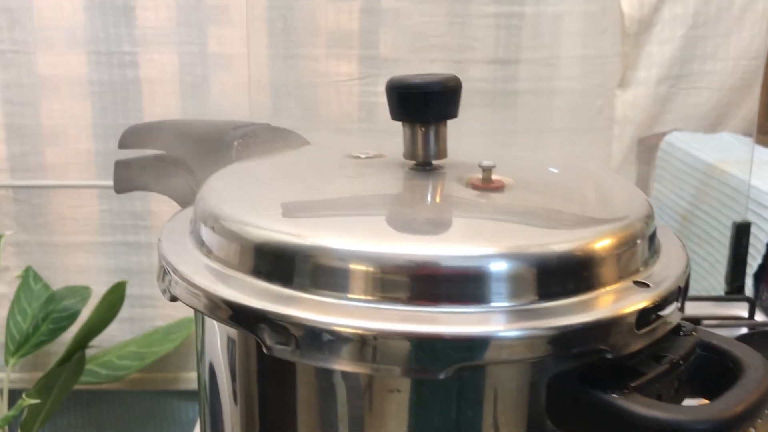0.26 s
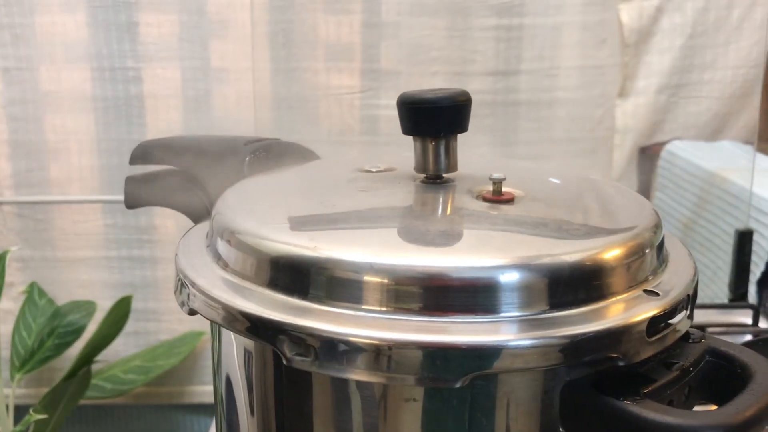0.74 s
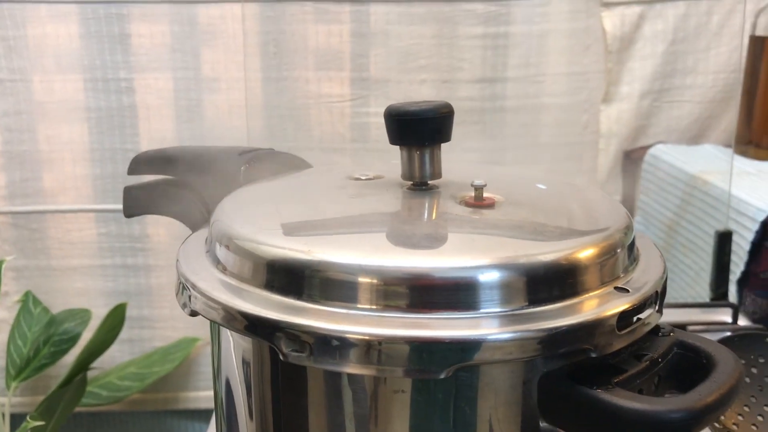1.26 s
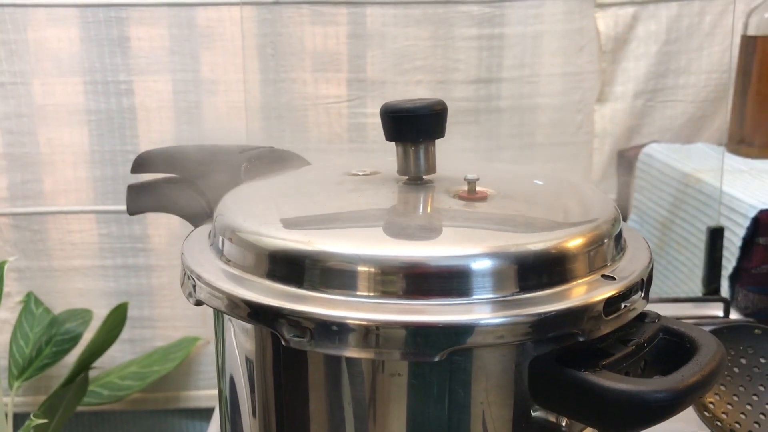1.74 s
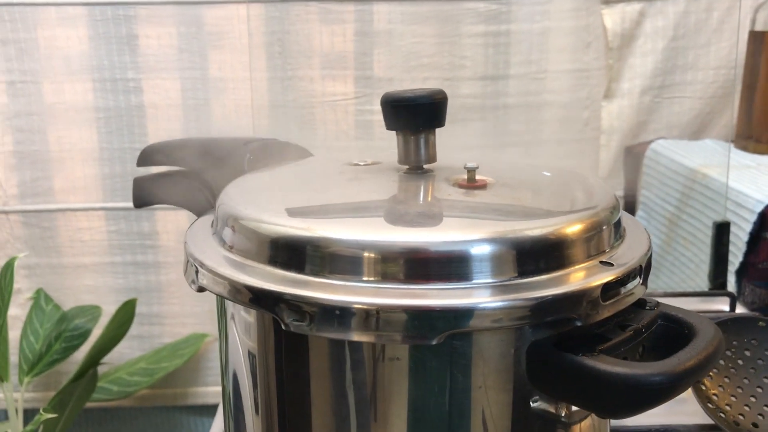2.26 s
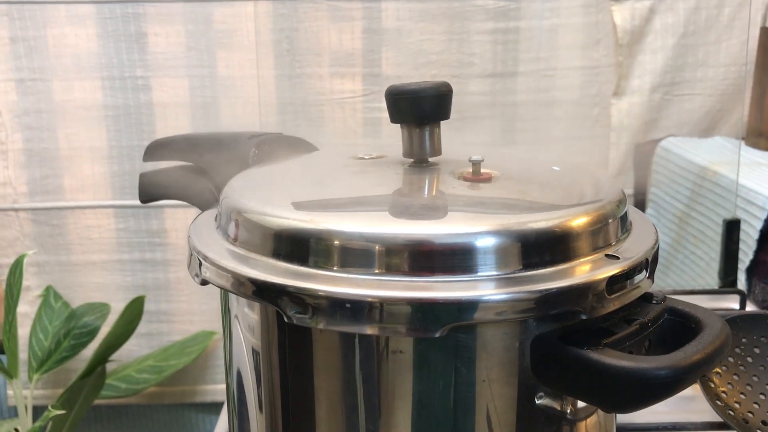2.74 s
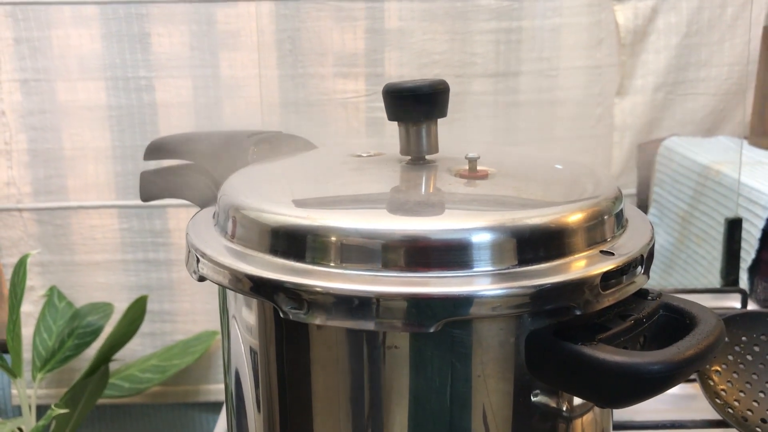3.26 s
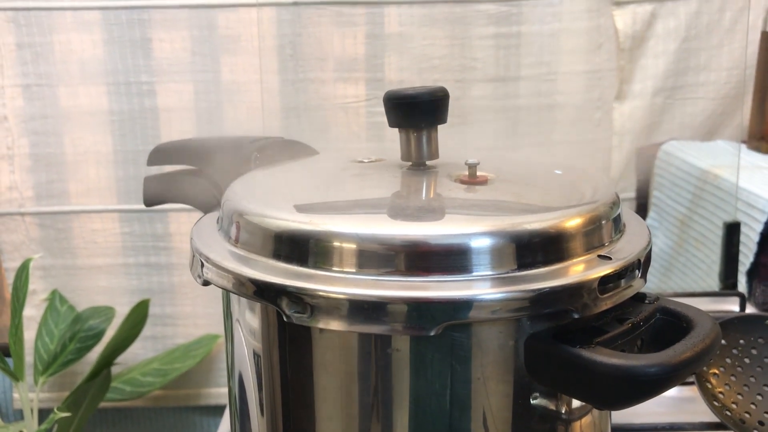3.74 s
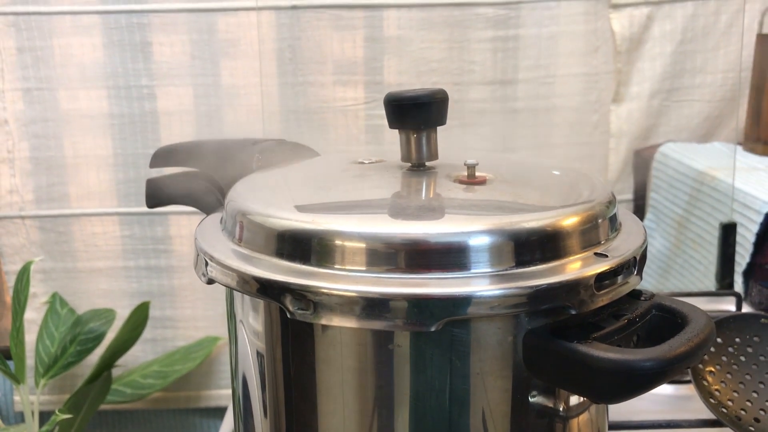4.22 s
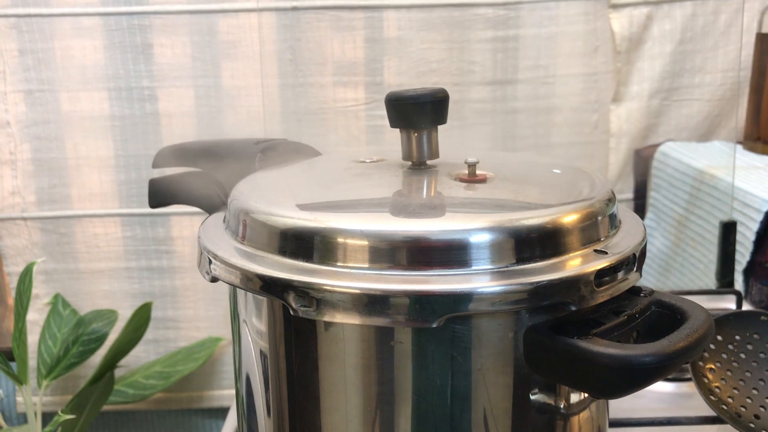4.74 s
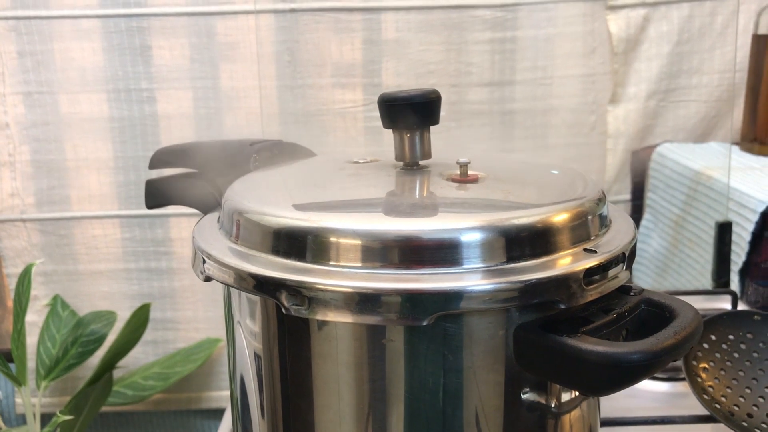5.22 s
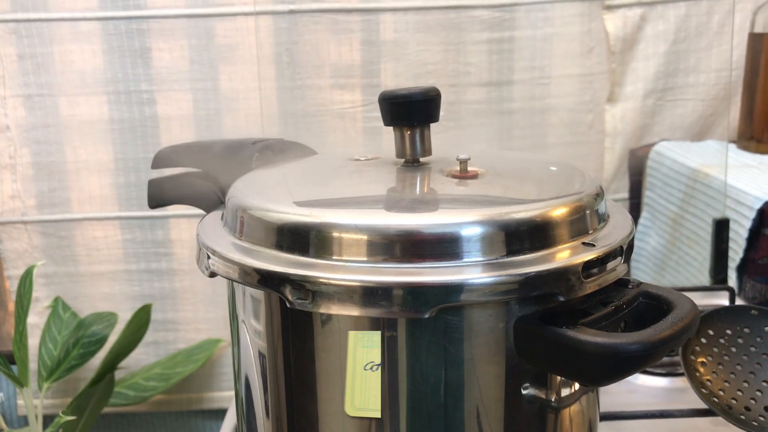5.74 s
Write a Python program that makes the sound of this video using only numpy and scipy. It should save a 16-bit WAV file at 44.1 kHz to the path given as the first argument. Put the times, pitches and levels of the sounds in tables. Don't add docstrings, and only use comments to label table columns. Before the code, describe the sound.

A pressure cooker blasts a continuous bright rush of steam, strongest at the start, over dull pot shudders and faint hum.

```python
import sys
import numpy as np
from scipy import signal
from scipy.fft import rfft, irfft, next_fast_len
from scipy.io import wavfile
from scipy.ndimage import uniform_filter1d, minimum_filter1d

SR = 44100
rng = np.random.default_rng(int(sys.argv[2]) if len(sys.argv) > 2 else 0)


def voltage_ratio(level):
    return 10 ** (np.asarray(level, float) / 20)


def inscribe(sig):
    pcm = np.round(np.clip(np.atleast_2d(sig).T, -1, 1) * 32767)
    wavfile.write(sys.argv[1], SR, pcm.astype(np.int16))


N = 264159


def rms_one(x):
    return x / np.sqrt(np.mean(x ** 2) + 1e-20)


def at_hz(points, hz):
    point_hz, value = np.transpose(points)
    return np.interp(np.log(hz), np.log(point_hz), value)


def drift(rate_hz):
    pole = np.exp(-80 * np.pi * rate_hz / SR)
    white = rng.standard_normal(N // 40 + 2002)
    slow = signal.lfilter([1], [1, -2 * pole, pole * pole], white)[2000:]
    return np.interp(np.arange(N) / 40, np.arange(len(slow)), rms_one(slow))


def noise_spectrum():
    size = next_fast_len(N)
    return np.maximum(np.fft.rfftfreq(size, 1 / SR), 1), rfft(rng.standard_normal(size)), size


# time in seconds, hiss level in dB.
JET = [(0.0, -13.5), (0.12, -16.5), (0.35, -14.8), (0.5, -16), (0.64, -16.3), (0.75, -18.3), (0.89, -16.2),
       (1.08, -17), (1.27, -15), (1.45, -16.5), (1.87, -16.3), (2.07, -17.5), (2.25, -16.3), (3.0, -16),
       (3.6, -16.8), (5.25, -16.5), (5.4, -15.5), (5.99, -16.7)]


def steam_flow():
    time_s, level_db = np.transpose(JET)
    flow_db = np.interp(np.arange(N) / SR, time_s, level_db)
    return flow_db, flow_db - flow_db.mean()


def kitchen(size):
    t60_s, room_db = 0.12, -12
    t = np.arange(SR // 2) / SR
    tail = rng.standard_normal(len(t)) * voltage_ratio(-60 * t / t60_s) * (t > .006)
    return voltage_ratio(room_db) * rfft(tail / np.linalg.norm(tail), size)


def mains_hum():
    hum_hz, hum_db, waver_db = 99.3, -59.7, 0.74
    sine = np.sqrt(2) * np.sin(2 * np.pi * hum_hz * np.arange(N) / SR)
    return voltage_ratio(hum_db + waver_db * drift(3.6)) * sine


# frequency in Hz, density in dB per Hz.
RUMBLE = [(13, -45), (22, -18), (48, -1), (70, -5), (92, -0.5), (125, -7), (182, -2.5), (247, -5.5),
          (416, -3), (453, -8), (700, -4), (910, -33), (1540, -120)]


def burner():
    rumble_db, flow_share = -52.5, 0.6
    f, white, size = noise_spectrum()
    skirt_db = -30 * np.abs(np.log2(np.clip(f, 22, 700) / f))
    rumble = rms_one(irfft(white * voltage_ratio(at_hz(RUMBLE, f) + skirt_db), size)[:N])
    _, swing_db = steam_flow()
    return rumble * voltage_ratio(rumble_db + flow_share * swing_db)


def wobbling_tone(hz, width_hz):
    pitch_hz = hz + 0.41 * width_hz * drift(15.8)
    return np.sqrt(2) * np.sin(2 * np.pi * np.cumsum(pitch_hz) / SR)


# frequency in Hz, width in Hz, resting level in dB.
THRUM_MODES = [(133, 7.2, -69), (187.7, 28, -66), (349, 20, -69.5)]
# centre in seconds, length in seconds, level in dB.
SHUDDERS = [
    [(0.03, 0.064, -52), (0.24, .22, -50), (0.6, 1.3, -58), (0.66, .1, -49), (0.98, .13, -53),
     (1.15, .1, -60), (1.42, .1, -55)],
    [(0.16, .05, -53), (1.06, .06, -54), (1.4, .05, -51), (1.49, .05, -57), (1.79, .05, -55),
     (2.05, .05, -57), (2.65, .06, -58), (2.92, .06, -53), (3.52, 0.093, -56), (4.13, .05, -57),
     (4.78, .16, -54), (5.12, .05, -56), (5.37, .05, -58)],
    [(0.19, .05, -54), (0.77, .09, -49), (1.02, .06, -53), (1.4, .07, -47)],
]


def pot_thrum():
    waver_db, trim_db = 3.0, -2.2
    t = np.arange(N) / SR
    out = np.zeros(N)
    for (hz, width_hz, rest_db), shudders in zip(THRUM_MODES, SHUDDERS):
        rest = voltage_ratio(rest_db + waver_db * drift(5.0))
        swells = sum(voltage_ratio(db + trim_db) * np.exp(-(2 * (t - s) / length_s) ** 4)
                     for s, length_s, db in shudders)
        out += (rest + swells) * wobbling_tone(hz, width_hz)
    return out


# time in seconds, peak level in dB.
TICKS = [
    (1.392, -36),
    (1.913, -31),
    (4.063, -34),
    (4.131, -32),
    (4.29, -38),
]


def ticks():
    cut_hz = 600
    time_s, peak_db = np.transpose(TICKS)
    clicks = np.full(N, 1e-18)
    clicks[(time_s * SR).astype(int)] = voltage_ratio(peak_db) * SR / (3 * cut_hz)
    return signal.sosfilt(signal.butter(2, [30, cut_hz], "band", fs=SR, output="sos"), clicks)


# frequency in Hz, density in dB per Hz.
JET_COLOUR = [(450, -35.5), (620, -23), (800, -24.5), (1080, -15.5), (1290, -16.5), (1480, -12),
              (2150, -11), (2800, -7.5), (3700, -2), (5000, -5), (6300, -3), (8000, -6.5), (11500, 1.5),
              (15700, 1)]
# frequency in Hz, width in Hz, gain in dB.
VENT = [(640, 110, 2), (900, 33, 1.5), (2790, 81, 3), (3090, 71, 3), (3500, 70, 2.5), (3620, 60, 2),
        (3780, 60, 1.5), (4110, 220, 2.5), (4490, 145, 3.5), (4600, 73, 3), (4760, 80, 0.5), (5080, 100, 1),
        (5320, 100, 3.5), (5640, 120, 1.5), (6010, 440, 2), (6180, 80, -1.5), (6510, 120, 2),
        (7330, 150, 2.5), (7420, 120, -2), (10220, 900, 0.5), (10400, 620, -6.5), (13650, 450, -2.2)]
# delay in ms, level in dB.
ECHOES = [(.4, -26.5), (2.45, -22.5), (5.15, -35.5), (8.5, -28), (12.3, -28)]


def jet_spectrum():
    echo_fade_hz = 10000
    f, white, size = noise_spectrum()
    colour_db = at_hz(JET_COLOUR, f) - 30 * np.maximum(np.log2(450 / f), 0)
    for hz, width_hz, gain_db in VENT:
        colour_db = colour_db + gain_db / (1 + (2 * (f - hz) / width_hz) ** 2)
    phase_per_ms = -2j * np.pi * f / 1000
    echoes = sum(voltage_ratio(db) * np.exp(phase_per_ms * ms) for ms, db in ECHOES) + kitchen(size)
    return f, white * voltage_ratio(colour_db) * (1 + echoes / (1 + (f / echo_fade_hz) ** 2)), size


def steam_jet(gust_db, patch_db, wander_db):
    bright_follows, low_follows = 1.1, 0.54
    bright_sag_db_per_s, low_rise_db_per_s = 0.26, 0.07
    flow_db, swing_db = steam_flow()
    t = np.arange(N) / SR
    bright_db = (bright_follows - 1) * swing_db - bright_sag_db_per_s * t
    low_db = (low_follows - 1) * swing_db + low_rise_db_per_s * t

    f, coloured, size = jet_spectrum()
    centres_hz = np.geomspace(600, 14500, 14)
    place = np.interp(np.log(f), np.log(centres_hz), np.arange(len(centres_hz)))
    gust = 0.25 * drift(6.0) + drift(40.0)
    out = np.zeros(N)
    for k, hz in enumerate(centres_hz):
        band = irfft(coloured * np.maximum(1 - np.abs(place - k), 0), size)[:N]
        share_db = np.zeros(1)
        if hz < 2500:
            share_db = low_db
        elif hz > 10500:
            share_db = bright_db
        eddies_db = gust_db * gust + patch_db * drift(8.1) + wander_db * drift(0.84)
        out += band * voltage_ratio(share_db - share_db.mean() + eddies_db)
    reference = signal.sosfilt(signal.butter(4, [2500, 10000], "band", fs=SR, output="sos"), out)
    return voltage_ratio(flow_db) * out / np.std(reference)


def scene():
    stove = mains_hum() + burner() + pot_thrum()
    jet = steam_jet(gust_db=0.22, patch_db=0.48, wander_db=0.15)
    return np.tile(stove + ticks() + jet, (2, 1))


def limiter(x):
    gain = np.minimum(1, .96 / (np.abs(x) + 1e-9))
    return x * uniform_filter1d(uniform_filter1d(minimum_filter1d(gain, 129), 64), 64)


def steep_cut(x, cutoff_hz):
    size = next_fast_len(N)
    passed = np.fft.rfftfreq(size, 1 / SR) < cutoff_hz
    return irfft(rfft(x, size) * passed, size)[:, :N]


# time in seconds, low edge in Hz.
SWAPS = [(.141, 4200), (.141, 5800), (.303, 4500), (.303, 6290), (.559, 9650), (.559, 11720), (1.116, 8270),
         (1.488, 14470), (1.72, 8600), (1.72, 13100), (1.813, 5200), (1.813, 10340), (2.068, 13100),
         (2.44, 14200), (2.997, 4500), (2.997, 6600), (2.997, 14470), (3.995, 5100), (4.158, 13100),
         (4.227, 4100), (4.227, 9650), (4.878, 14470), (5.04, 14200), (5.249, 5100), (5.272, 14470),
         (5.481, 9650), (5.76, 6290), (5.76, 12400)]


def noise_swaps(x):
    width_hz, frame_offset = 1380, 95
    out, n = x.copy(), np.arange(2048)
    fade = np.sin(np.pi * (n + .5) / 2048) / np.sqrt(512)
    noises = rng.standard_normal((len(SWAPS), 2, 1024))
    for (s, low_hz), noise in zip(SWAPS, noises):
        start = round(s * SR / 1024 - 1) * 1024 + frame_offset
        lines = np.arange(round(low_hz * 2048 / SR), round((low_hz + width_hz) * 2048 / SR))
        waves = fade * np.cos(np.pi / 1024 * np.outer(lines + .5, n + 512.5))
        band = x[:, start + n] @ waves.T
        new_band = np.clip(noise[:, lines], -1.8, 1.8) * np.std(band)
        out[:, start + n] += (new_band - band) @ waves
    return out


def band_limit(x):
    return signal.sosfilt(signal.butter(12, 16270, fs=SR, output="sos"), x)


def record(dry):
    mix = noise_swaps(steep_cut(limiter(dry), cutoff_hz=15740))
    return band_limit(mix)


dry = scene()
out = record(dry)
inscribe(out)
```